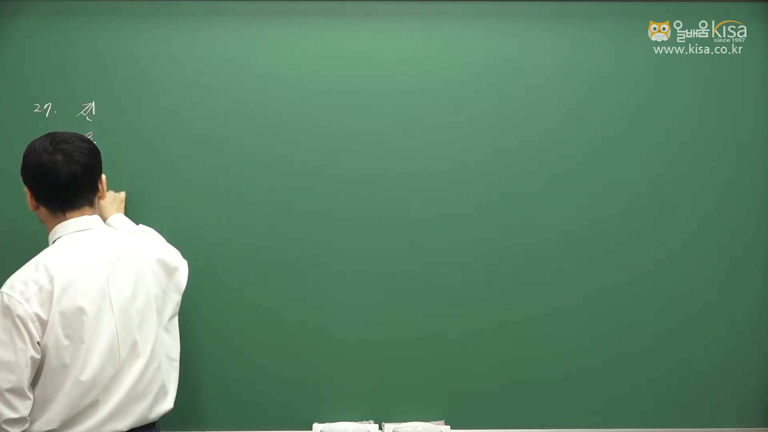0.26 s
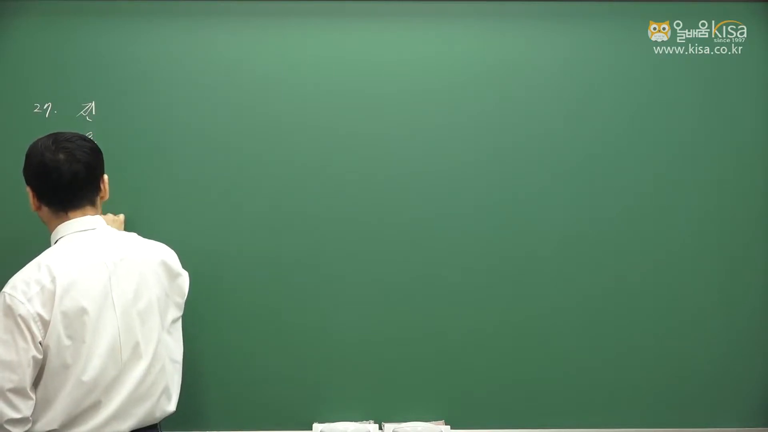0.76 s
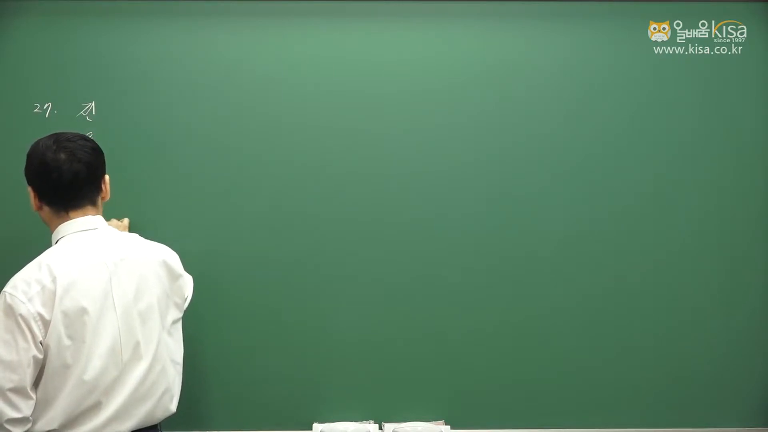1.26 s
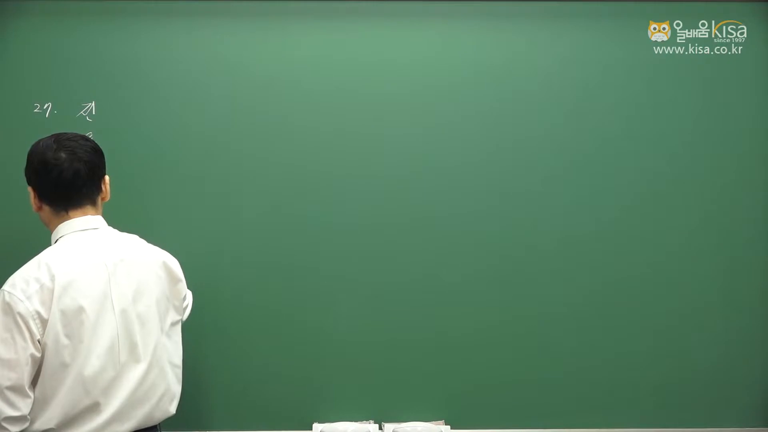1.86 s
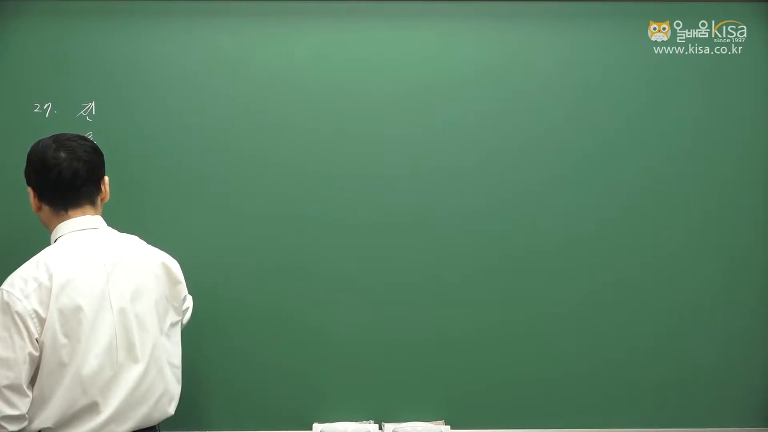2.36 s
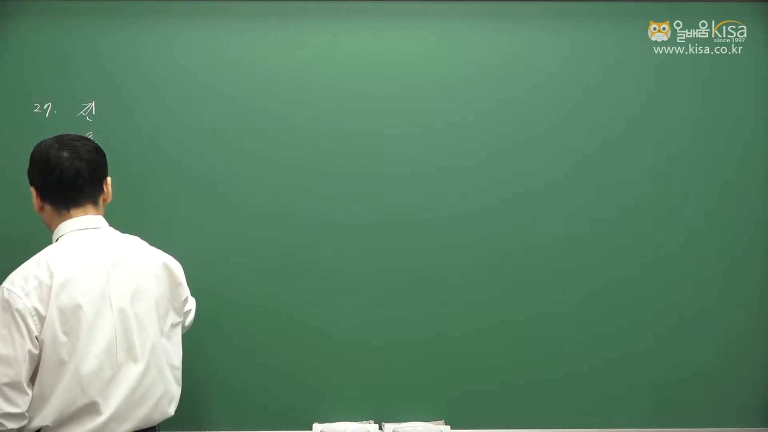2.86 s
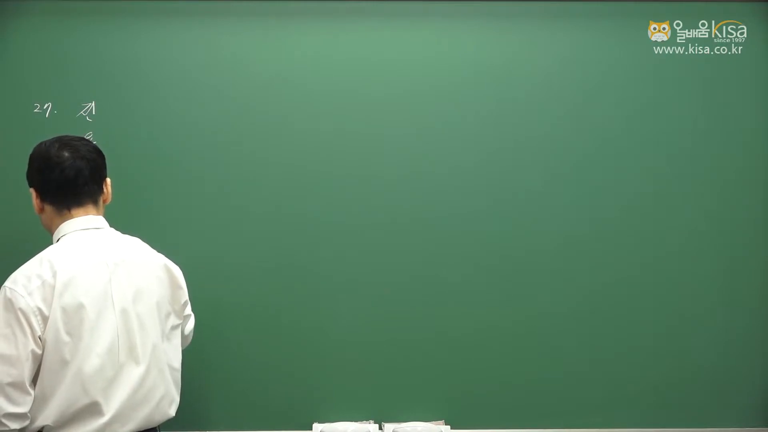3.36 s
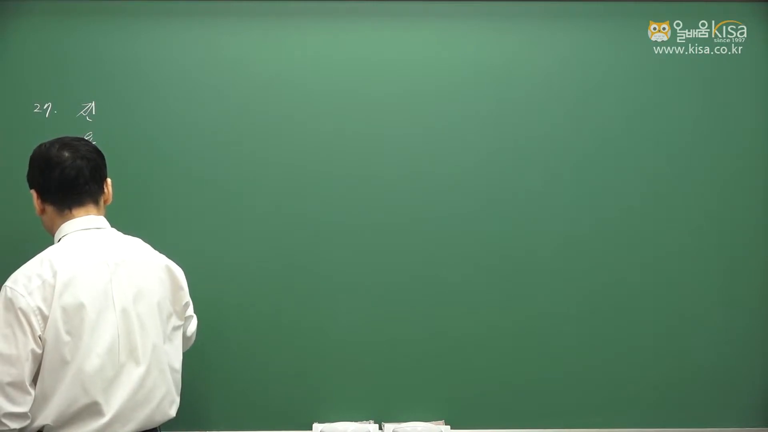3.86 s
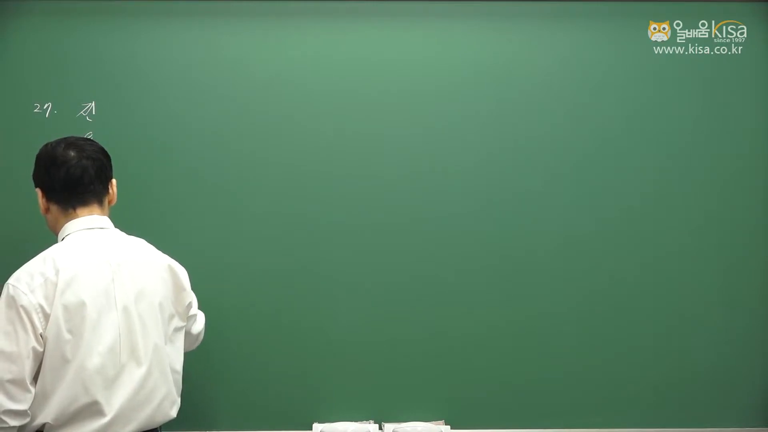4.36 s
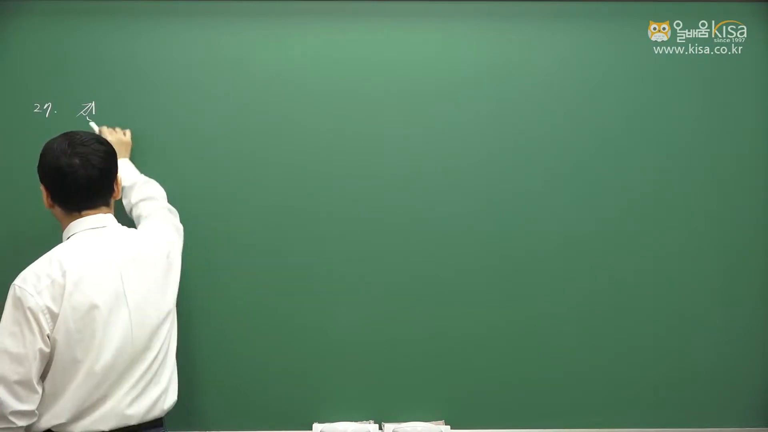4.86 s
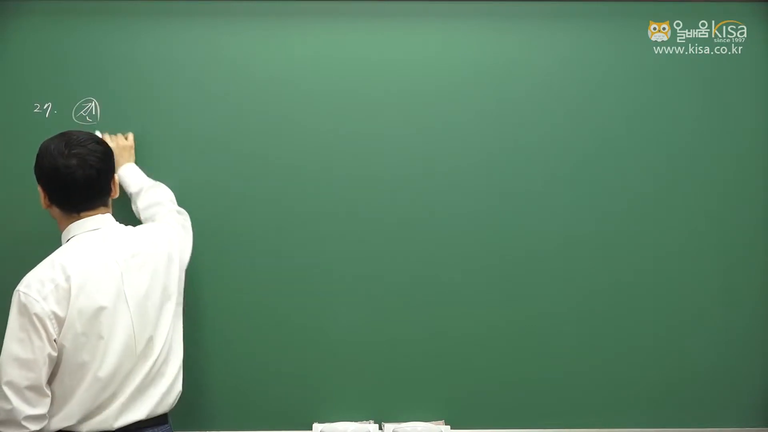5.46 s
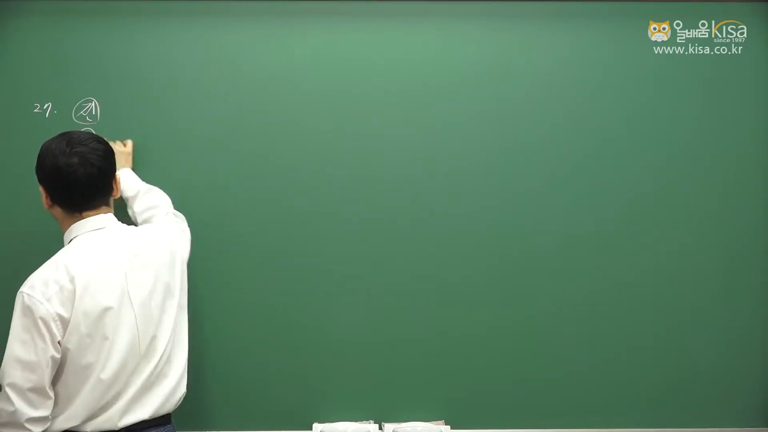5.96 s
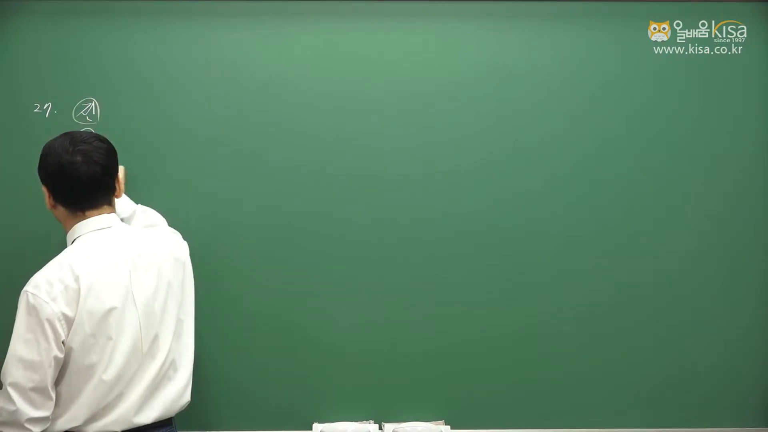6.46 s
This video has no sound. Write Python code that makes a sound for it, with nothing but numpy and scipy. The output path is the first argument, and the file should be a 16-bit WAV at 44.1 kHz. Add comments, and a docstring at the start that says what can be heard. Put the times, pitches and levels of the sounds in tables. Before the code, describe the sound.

Chalk writes on a chalkboard, heard close up in a quiet classroom. Sharp, unevenly spaced taps each ring the board briefly, and many are followed by a short, dry scrape. After the loudest tap a sleeve rustles softly, and the chalk draws three quick circles, each with a rasp that rises in pitch. A few soft low thumps come and go over a low room rumble and faint hiss.

```python
"""Chalk on a classroom board

Close to the writer in a quiet room. Each landing of the chalk is a sharp tap that rings the
wall-mounted panel; short scrapes follow from crumbling grains and the resonating stick. Three circles
end the writing, their rasp climbing as the hand comes round. A sleeve rustles, soft low thumps come
and go, and the room rumbles under a faint hiss and a thin electrical whine."""
import sys
import numpy as np
from scipy import signal
from scipy.fft import rfft, irfft, next_fast_len
from scipy.io import wavfile
from scipy.ndimage import uniform_filter1d, minimum_filter1d, map_coordinates

SR = 44100
rng = np.random.default_rng(int(sys.argv[2]) if len(sys.argv) > 2 else 0)


def put_to_file(sound):
    """Save the sound as 16-bit audio at rate SR, in the file named by the first command-line argument."""
    columns = np.atleast_2d(sound).T  # one column per channel
    safe = np.clip(columns, -1, 1)
    whole_steps = np.round(safe * 32767)
    wavfile.write(sys.argv[1], SR, whole_steps.astype(np.int16))


N = 296345

# decay of the panel's ring: (frequency [Hz], T60 [s])
PANEL_T60 = [(200, 0.65), (530, 0.49), (1000, 0.31), (2000, 0.22), (3700, 0.21), (9000, 0.27)]
ATTACK_S = 0.025  # lines and circles


def taps():
    """Each landing clicks and rings the panel at a new spot; hard ones are more click than ring."""
    # (time [s], level [dB], treble [dB], thud [dB], low mode [Hz], mid mode [Hz], upper-mode tilt [dB])
    landings = [(0.5212, -14.5, -1.5, 0, 1070, 2190, -3), (0.7912, -17, -1, -2.5, 1257, 2200, 4.5),
                (1.261, -14, 3.5, -2.5, 790, 2250, 4), (1.4767, -18, 1, -3, 1126, 2080, -7),
                (2.05, -14, 5, 0, 860, 1740, 0.5), (2.5199, -13.5, 2.5, 1, 1060, 1880, -2),
                (2.7937, -14.5, -5.5, -2.5, 1280, 1450, -3.5), (3.3739, -12.5, -0.5, -.5, 1057, 1720, 1),
                (3.7568, -13.5, -5.5, -3, 1130, 1370, -7), (4.1749, -12, 0, -4.5, 1140, 2120, 3.5),
                (4.5004, -6.5, 7, 0, 1130, 1960, 3), (4.9904, -9, 5, 8, 1180, 1630, -2.5),
                (5.6157, -10, 9.5, 3.5, 1150, 1745, -3.5), (6.045, -35.5, -8, -7, 1130, 1660, -1),
                (6.2238, -20.5, -9, -1.5, 792, 2150, 1)]
    # spectra of first contact and panel ring: (frequency [Hz], density [dB])
    click_spectrum = [(100, -14.5), (260, -18), (400, -5), (800, -3), (1100, -0.5), (1450, -3), (1900, -2),
                      (3050, 0.5), (3700, -6), (4350, -6.5), (5200, -15), (7500, -17), (9500, -27.5),
                      (15500, -39.5)]
    ring_spectrum = [(100, -14.5), (300, -24), (500, -8), (650, -6.5), (1020, -0.5), (1450, -4.5),
                     (2000, -4), (3000, -10.5), (3600, -13.5), (4350, -21.5), (5200, -29.5), (7500, -32),
                     (15000, -45.5)]
    usual_tap_db, ring_offset_db, ring_db_per_db = -16, -6, 0.86
    spread_s = 0.0026  # ring builds as the waves spread
    scale = np.sqrt(SR / 100)  # unit energy to rms 1 over 10 ms
    out = np.zeros(N)
    for time_s, level_db, *spot in landings:
        impact = contact(hold_s=0.0026, t60_s=0.028, push=0.37)
        click = causal_filter(impact, lambda hz: log_interp(click_spectrum, hz) + spot_db(hz, *spot))
        modes = decaying_modes(PANEL_T60)
        ring = causal_filter(modes, lambda hz: log_interp(ring_spectrum, hz) + 0.67 * spot_db(hz, *spot))
        ring *= 1 - np.exp(-np.arange(len(ring)) / SR / spread_s)
        ring_db = usual_tap_db + ring_offset_db + ring_db_per_db * (level_db - usual_tap_db)
        add(out, time_s, scale * amp(level_db - 1.82) * click / np.linalg.norm(click))
        add(out, time_s, scale * amp(ring_db) * ring / np.linalg.norm(ring))
    return out


def contact(hold_s, t60_s, push):
    """Sharp push, then bending waves thrown back by the frame."""
    t = np.arange(4096) / SR
    onset = np.clip((t - .0004) / .0008, 0, 1)
    waves = rng.standard_normal(len(t)) * onset * amp(-60 * np.maximum(t - hold_s, 0) / t60_s)
    waves = whiten(np.pad(waves, (512, 0)), width_hz=860)[512:]
    waves /= np.linalg.norm(waves)
    waves[0] -= push
    return waves


def spot_db(hz, treble_db, thud_db, low_hz, mid_hz, tilt_db):
    """The struck spot favours some modes; a crisp landing lifts the treble, a heavy one the bass."""
    # two upper panel modes: (frequency [Hz], half-width [oct], peak [dB])
    upper_modes = [(2374, 0.059, 3.5), (3130, 0.054, 2)]
    modes = [(low_hz, .13, 7.3), (mid_hz, .065, 8.7)]
    for (mode_hz, width_oct, db), shift_db in zip(upper_modes, (-tilt_db, tilt_db)):
        modes.append((mode_hz, width_oct, db + shift_db))
    modes_db = np.max([db * peak(hz, mode_hz, width_oct) for mode_hz, width_oct, db in modes], axis=0)
    return modes_db + treble_db * (1 - low_shelf(hz, 2980)) + thud_db * low_shelf(hz, 650)


def decaying_modes(t60_table):
    """0.5 s of dense modes, each frequency fading at its own rate; energy 1."""
    noise = whiten(rng.standard_normal(SR // 2), width_hz=100)
    hz, t, spectra = signal.stft(noise, SR, nperseg=256)
    decay = amp(-60 * t / log_interp(t60_table, hz)[:, None])
    tail = signal.istft(spectra * decay, SR, nperseg=256)[1]
    return tail / np.linalg.norm(tail)


def strokes():
    """Short lines: the chalk grips, slides with uneven pressure and lifts."""
    # (start [s], length [s], level [dB], stick's share of power [0-1])
    slides = [(0.092, 0.071, -48, 0.77), (0.558, 0.085, -45, .35), (0.818, 0.078, -41.5, 0.8),
              (0.947, .092, -45, .85), (1.068, 0.074, -45.5, 0.97), (1.298, 0.05, -47, .4),
              (1.514, 0.097, -41, 0.6), (2.086, 0.079, -42, .3), (2.205, 0.1, -43.5, 0.65),
              (2.537, .15, -39, .15), (3.014, 0.11, -50.5, 0.3), (3.396, 0.057, -42.5, 0.1),
              (3.509, 0.132, -49.5, 0.02), (3.777, 0.12, -44, 0), (4.224, 0.081, -45.5, 0.25),
              (4.353, .039, -46.5, 0.5), (5.634, 0.051, -39.5, .4), (6.233, 0.029, -32.5, 0.46)]
    # dry scratch: (frequency [Hz], density [dB])
    scratch_spectrum = [(300, -35), (900, 2), (1700, -2), (2700, -4), (4000, -8), (5600, -8), (7500, -4.5),
                        (9000, -12), (11000, -12), (15500, -24)]
    pressure = sum(amp(db) * touch(s, s + span_s, release_s=0.061) for s, span_s, db, _ in slides)
    start_s, length_s, _, shares = np.transpose(slides)
    edges_s = np.column_stack([start_s, start_s + length_s]).ravel()
    held = lambda values: np.interp(clock(), edges_s, np.repeat(values, 2))
    share = np.clip(held(shares), 0, 1)
    dust = coloured(crumble(grains_per_s=2500, rub=0.96), scratch_spectrum)
    pitch_ratio = 0.93 * (1 + .015 * rng.standard_normal(len(slides)))  # grip varies by stroke
    scrape = np.sqrt(1 - share) * dust + np.sqrt(share) * stick(held(pitch_ratio), wander=0.0049)
    return pressure * amp(1.4 * wobble(70)) * frame_echoes(scrape, pitch_ratio=0.97, sway=0.055, gain=0.2)


def circles():
    """Curved strokes: dusty hiss, rasp and thin squeal; resonances climb as the hand comes round."""
    # dust hiss: (frequency [Hz], density [dB])
    hiss_spectrum = [(300, -14), (800, -17), (1400, -7), (2800, 1.5), (3700, 0.5), (4500, -1.5), (5800, -2),
                     (7000, 0), (8000, -7.5), (8800, -10.5), (11000, -8), (12500, -17), (15500, -17.5)]
    rasp_low_hz, rasp_top_hz, squeal_hz = 1460, 2555, 4500
    pressure, turn, flick = circling_hand()
    climb = (rasp_top_hz / rasp_low_hz) ** turn
    rise = uniform_filter1d(climb, size=4096) ** .25  # stick and echoes partly follow the rasp
    dust = coloured(crumble(grains_per_s=2000, rub=1.0), hiss_spectrum)
    stick_ring = amp(-9.5) * stick(.9 * rise, wander=.025)
    hiss = frame_echoes(dust + stick_ring, pitch_ratio=rise, sway=.1, gain=.45)
    rasp = friction_resonance(rasp_low_hz * climb * (1 + 0.043 * wobble(30)), width_hz=350)
    squeal = friction_resonance(squeal_hz * (1 + 0.011 * wobble(14)), width_hz=180)
    hiss *= pressure * amp(1.5 + 3.5 * turn) + flick
    rasp *= pressure * amp(-.5 - 3 * turn)
    squeal *= pressure * amp(-9) * np.sin(np.pi * turn)  # strongest halfway up
    flutter_db = 1.4 * wobble(90) + 1.3 * wobble(12)
    return amp(flutter_db) * (hiss + rasp + squeal)


def circling_hand():
    """Pressure, turn of the stick (0-1) and closing flick: the chalk bites in, eases off and leaves."""
    # (start [s], end [s], level [dB], pitch climb [s], easing near the end [dB])
    arcs = [(5.062, 5.489, -38, 0.13, 1), (5.678, 6.06, -38.5, .11, 6), (6.249, 6.644, -40, 0.15, 3)]
    bite_db, bite_s, drop_s = 12, 0.048, .04
    top_lead_s, ease_lead_s, flick_lead_s = .063, 0.04, 0.018  # ahead of the end
    t = clock()
    pressure, turn, flick = np.zeros((3, N))
    for start_s, end_s, level_db, climb_s, ease_db in arcs:
        soft_start_db = bite_db * np.exp(-np.maximum(t - start_s, 0) / bite_s)
        soft_end_db = ease_db * bell(t - end_s + ease_lead_s, width_s=0.046)
        pressure += touch(start_s, end_s, release_s=0.014) * amp(level_db - soft_start_db - soft_end_db)
        past_top_s = t - end_s + top_lead_s
        turn += bell(past_top_s, np.where(past_top_s < 0, climb_s, drop_s))
        flick += amp(-43) * bell(t - end_s + flick_lead_s, width_s=0.0087)
    return pressure, turn, flick


def skips():
    """Flurries of tiny impacts as the tip flicks off."""
    # (centre [s], level [dB], half-width [s])
    flurries = [(1.144, -45.5, 0.013), (1.786, -50, 0.011), (4.379, -42, 0.0078), (5.476, -34, 0.015),
                (6.047, -32, .008), (6.631, -35, 0.013), (6.669, -47, .008)]
    # skipping tip: (frequency [Hz], density [dB])
    skip_spectrum = [(150, 8.5), (500, -9.5), (1000, 3.5), (1300, -2), (1600, 6.5), (2000, 1), (2600, -6),
                     (4500, -19), (8000, -6), (12000, -15), (15500, -30)]
    return swells(flurries) * coloured(crumble(grains_per_s=980, rub=0.69), skip_spectrum)


def crumble(grains_per_s, rub):
    """Chalk grains breaking off over a smooth rub."""
    grains = (rng.random(N) < grains_per_s / SR) * rng.standard_normal(N)
    return unit_rms(unit_rms(grains) + rub * rng.standard_normal(N))


def stick(pitch_ratio, wander):
    """Resonances of the sliding chalk stick, each wandering with the grip."""
    # (frequency at ratio 1 [Hz], width [Hz], level [dB])
    modes = [(2380, 210, -2), (3194, 470, -1.5), (3600, 160, -9), (5370, 380, -4.5), (7070, 690, -7)]
    ring = np.zeros(N)
    for hz, width_hz, db in modes:
        ring += amp(db) * friction_resonance(hz * pitch_ratio * (1 + wander * wobble(12)), width_hz)
    return unit_rms(ring)


def friction_resonance(pitch_hz, width_hz):
    """Friction noise in a resonance that glides as the stick turns in the fingers."""
    pole = np.exp(-2 * np.pi * width_hz / SR)
    in_phase, quadrature = signal.lfilter([1], np.poly([pole, pole]), rng.standard_normal((2, N)))
    phase = 2 * np.pi * np.cumsum(pitch_hz) / SR
    return unit_rms(in_phase * np.cos(phase) + quadrature * np.sin(phase))


def frame_echoes(x, pitch_ratio, sway, gain, count=7):
    """Reflections from the frame; each path changes length as the hand moves."""
    out = x.copy()
    for base_s, sign in zip(rng.uniform(0.000743, .0035, count), rng.choice([-1, 1], count)):
        delay_s = base_s / pitch_ratio * np.exp(sway * wobble(5))
        out += sign * gain * np.interp(np.arange(N) - SR * delay_s, np.arange(N), x)
    return unit_rms(out)


def scrape_ring(friction):
    """Scrapes ring the panel and room too, mostly in the midrange."""
    response = [(1200, -7.5), (3000, -11), (6000, -13)]  # (frequency [Hz], gain [dB])
    ring = signal.fftconvolve(friction, decaying_modes(PANEL_T60))[:N]
    return filtered(ring, lambda hz: amp(log_interp(response, hz)))


def sleeve():
    """Cloth rustles as the arm moves."""
    # (centre [s], level [dB], half-width [s])
    arm_moves = [(4.8, -45, 0.19), (5.55, -52, 0.39), (6.65, -51.5, 0.51)]
    # rustle: (frequency [Hz], density [dB])
    cloth_spectrum = [(30, 7), (150, 0.5), (400, -1.5), (1000, -9.5), (2500, -12.5), (7000, -14.5),
                      (15000, -33)]
    flutter = amp(1.8 * wobble(25))
    return swells(arm_moves) * flutter * coloured(rng.standard_normal(N), cloth_spectrum)


def thumps():
    """Soft, brief swells of low noise."""
    # (centre [s], level [dB], half-width [s])
    pulses = [(2.572, -30.5, 0.021), (2.66, -38, 0.042), (4.92, -39, 0.023), (5.052, -30.5, 0.013),
              (5.3, -39, 0.011), (5.45, -36.5, 0.04), (5.845, -37, 0.019), (6.055, -41, 0.022),
              (6.665, -38.5, 0.02)]
    # source rumble: (frequency [Hz], density [dB])
    rumble_spectrum = [(12, -22.5), (30, -0.5), (55, -1.5), (90, -16.5), (150, -21), (400, -16),
                       (1500, -80)]
    rumble = coloured(rng.standard_normal(N), rumble_spectrum)
    steady = np.cos(np.angle(signal.hilbert(rumble)))  # envelope flattened
    return swells(pulses) * coloured(steady, [(80, -6.5), (160, -6.5), (500, -21)])


def background():
    """Room rumble with hiss, and a thin electrical whine."""
    # room tone: (frequency [Hz], density [dB])
    room_spectrum = [(12, -39), (20, -3.5), (53, -1.5), (90, -2), (130, -6), (197, -7), (386, -10.5),
                     (443, -9.5), (637, -15), (733, -14), (1020, -17.5), (1690, -20), (5320, -26.5),
                     (12600, -31.5), (15800, -32.5)]
    whine_hz = 12448
    room = amp(-49.0 + 0.2 * wobble(2.73)) * coloured(rng.standard_normal(N), room_spectrum)
    whine = amp(-74 + wobble(6)) * unit_rms(np.sin(2 * np.pi * whine_hz * clock()))
    return room + whine


def amp(db):
    return 10 ** (np.asarray(db) / 20)


def unit_rms(x):
    return x / np.sqrt(np.mean(x ** 2) + 1e-20)


def clock():
    return np.arange(N) / SR


def add(track, time_s, sound):
    part = track[round(time_s * SR):][:len(sound)]
    part += sound[:len(part)]


def wobble(rate_hz):
    """Smooth random curve, rate_hz knots a second."""
    knots = rng.standard_normal(int(N * rate_hz / SR) + 4)
    return map_coordinates(knots, [np.arange(N) * rate_hz / SR])


def touch(start_s, end_s, release_s):
    """Attack, hold, release; ramps centred on the stroke's ends."""
    t = clock()
    return np.clip(.5 + np.minimum((t - start_s) / ATTACK_S, (end_s - t) / release_s), 0, 1)


def bell(t, width_s):
    return np.exp(-np.minimum((t / width_s) ** 2, 50))


def swells(rows):
    """Sum of bell envelopes."""
    return sum(amp(db) * bell(clock() - centre_s, width_s) for centre_s, db, width_s in rows)


def low_shelf(hz, edge_hz):
    return 1 / (1 + (hz / edge_hz) ** 4)


def peak(hz, centre_hz, width_oct):
    return 1 / (1 + (np.log2((hz + 1) / centre_hz) / width_oct) ** 2)


def log_interp(points, hz):
    """(frequency [Hz], value) points read on a log axis."""
    knots_hz, values = np.transpose(points)
    return np.interp(np.log(hz + 1), np.log(knots_hz + 1), values)


def filtered(x, response):
    """Zero-phase filter with gain response(hz)."""
    size = next_fast_len(len(x) + 8192)
    return irfft(rfft(x, size) * response(np.fft.rfftfreq(size, 1 / SR)), size)[:len(x)]


def coloured(x, spectrum):
    """x shaped by (frequency [Hz], gain [dB]) points; rms 1."""
    return unit_rms(filtered(x, lambda hz: amp(log_interp(spectrum, hz))))


def causal_filter(x, gain_db, size=4096):
    """Minimum-phase filter with gain_db(hz)."""
    cepstrum = irfft(np.log(amp(gain_db(np.fft.rfftfreq(size, 1 / SR)))))
    cepstrum[1:size // 2] *= 2
    cepstrum[size // 2 + 1:] = 0
    return signal.fftconvolve(x, irfft(np.exp(rfft(cepstrum))))[:len(x)]


def whiten(x, width_hz):
    """Equal energy in broad bands; narrow peaks stay."""
    spectrum = rfft(x)
    power = uniform_filter1d(np.abs(spectrum) ** 2, max(3, int(width_hz * len(x) / SR)))
    return irfft(spectrum / np.sqrt(np.abs(power) + 1e-12), len(x))


def scene():
    """Mono mix of chalk, sleeve, thumps and room."""
    friction = strokes() + circles() + skips()
    ring = scrape_ring(friction)
    return (taps() + amp(-2.27) * friction + ring + sleeve() + thumps() + background())[None]


def record(dry):
    """Fast limiter at full scale, then a steep low-pass."""
    cutoff_hz = 15950
    needed_gain = 1 / np.maximum(np.abs(dry[0]), 1)
    gain = uniform_filter1d(minimum_filter1d(needed_gain, size=41), size=41)
    return filtered(dry[0] * gain, lambda hz: 1 / (1 + (hz / cutoff_hz) ** 160))[None]


dry = scene()
out = record(dry)
put_to_file(out)
```